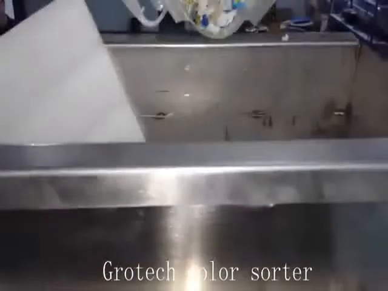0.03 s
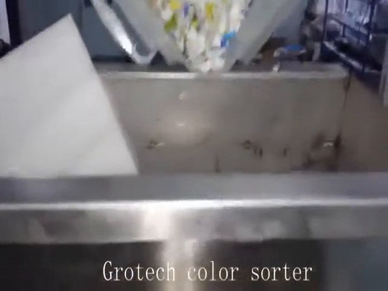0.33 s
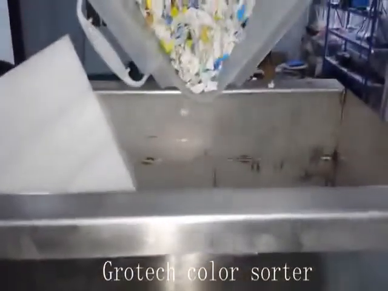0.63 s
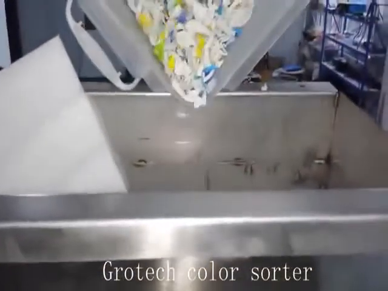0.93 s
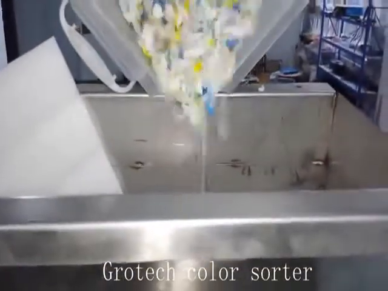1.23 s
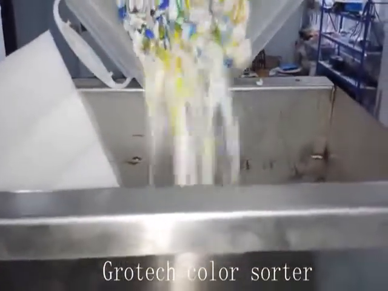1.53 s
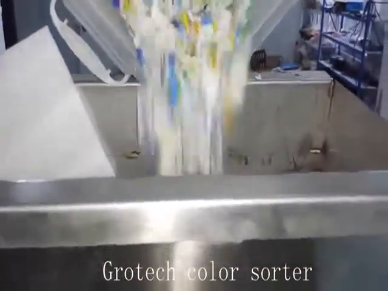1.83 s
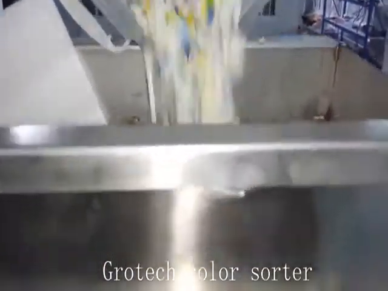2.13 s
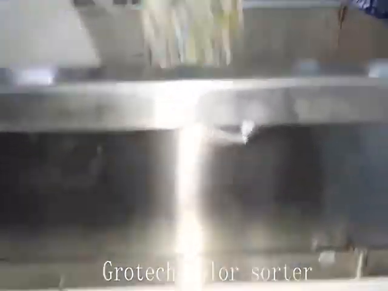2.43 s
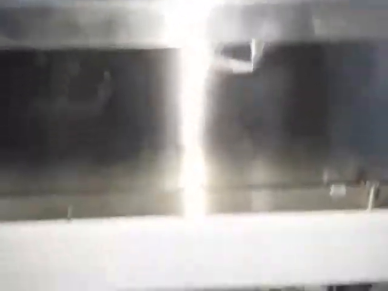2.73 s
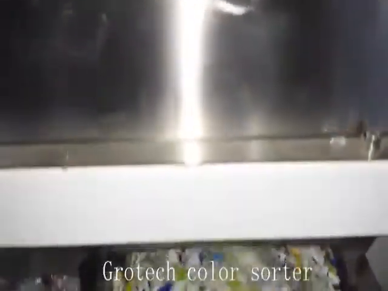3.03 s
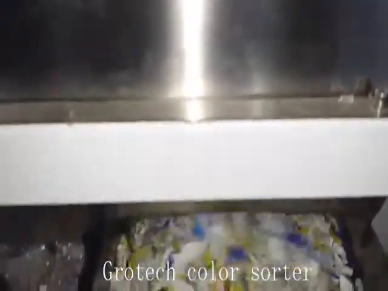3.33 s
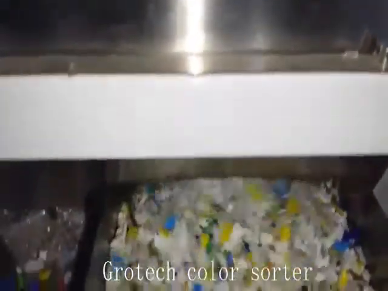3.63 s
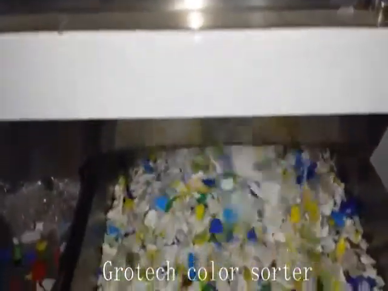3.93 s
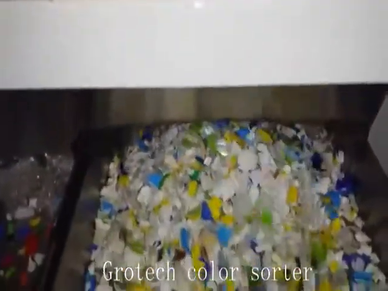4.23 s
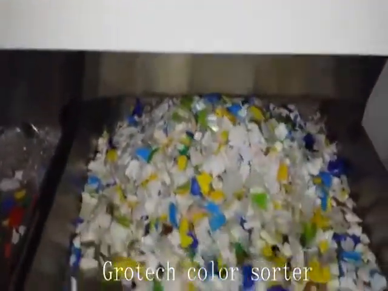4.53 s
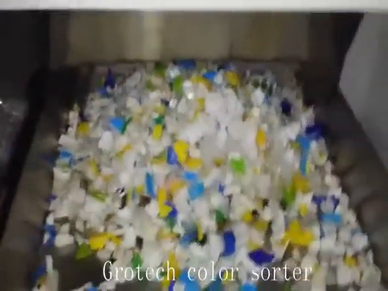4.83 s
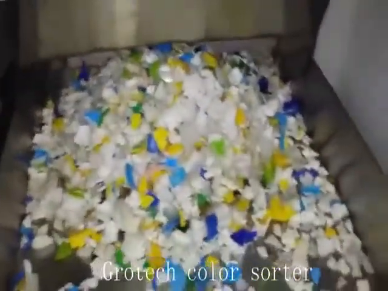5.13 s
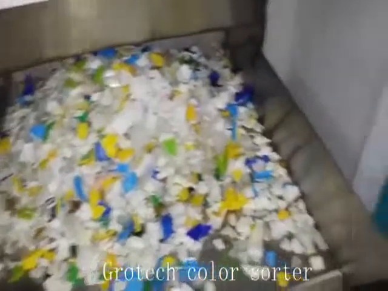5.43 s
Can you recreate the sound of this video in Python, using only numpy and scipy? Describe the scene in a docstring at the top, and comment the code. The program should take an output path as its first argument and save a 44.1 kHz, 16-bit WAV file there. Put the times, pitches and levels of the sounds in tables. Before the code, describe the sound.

Plastic flakes trickle, then pour hissing and rattling into a steel hopper, dying away over the low rumble of factory machines.

```python
"""A machine hall, stereo microphone close to the steel hopper of a sorting machine.
Plastic flakes slide out of a bag and pour in: thousands of tiny collisions hiss and rattle, the sheet
steel drums under them, and single flakes snap out. Further off, machines rumble and hum; thin whistles
come in near the end. The recorder's gain control pushes the hall back while the pour is loud and lets
it creep up again as the stream dies away."""
import sys
import numpy as np
from scipy import signal
from scipy.fft import rfft, irfft, next_fast_len
from scipy.io import wavfile
from scipy.ndimage import uniform_filter1d, map_coordinates

SR = 44100
rng = np.random.default_rng(int(sys.argv[2]) if len(sys.argv) > 2 else 0)


def transcribe(u):
    """Save the signal u as a 16-bit wav file named by the first command-line argument.

    u: samples, shape (n,) or (channels, n), limited to [-1, 1]; the rate is SR.
    q: integer samples, one column per channel.
    """
    v = np.clip(np.atleast_2d(u).T, -1, 1)
    q = np.round(v * 32767).astype(np.int16)
    wavfile.write(sys.argv[1], SR, q)


N = 246078

# spectrum of the distant machines: f/Hz, level/dB
RUMBLE_SPECTRUM = [(25,-17), (60,-7.5), (100,0), (160,2), (330,-1), (500,-2.5), (800,-5), (1150,-7),
                   (1600,-12.5), (2400,-13), (3300,-18.5), (5000,-16.5), (8000,-19), (14000,-58)]
# how alike their rumble is left and right: f/Hz, correlation
RUMBLE_LIKENESS = [(30, 0.14), (100, 0.94), (300, 0.82), (600, 0.68), (1200, 0.035), (4000, 0.089)]
# tones of the machine frames: f/Hz, relative level/dB
DRONE_TONES = [(168,-6), (234,-1), (338,-2.5), (409,-2), (915,-11.5), (1100,-4.5)]
# strength of the stream of flakes: t/s, level/dB
STREAM_FLOW = [(0,-21.5), (.22,-29), (.5,-42.5), (.68,-39.5), (.85,-35.5), (1.15,-33.5), (1.39,-29.5),
               (1.43,-36), (1.49,-15), (1.535,-16), (1.56,-22.5), (1.588,-17), (1.608,-27.5), (1.63,-6),
               (1.75,-7.5), (1.88,-1), (2.35,-.5), (2.6,1.5), (3.2,-2), (3.9,-4.5), (3.955,-9.5),
               (4.005,-17.5), (4.05,-16), (4.2,-22.5), (4.5,-42), (4.9,-51), (5.42,-53), (5.58,-36.5)]
# clumps that land at once: t/s, length/s, hiss swell/dB, wall swell/dB, floor swell/dB
CLUMP_SWELLS = [(0.334,0.012,2,-1,-4), (.781,0.016,4,6,5), (1.221,0.044,2,2,7), (1.354,0.0097,1,3,5),
                (1.5,0.028,0.5,-1,1.5), (1.658,0.037,3.5,4.5,-3.5), (1.791,0.03,7.5,10,3.5),
                (1.881,0.016,3,6.5,1), (1.927,0.0085,1.5,1.5,-1), (1.974,0.012,3,7,-3),
                (2.038,0.029,4.5,2,5), (2.157,0.023,3,1,2.5), (2.344,0.097,1.5,1,7), (2.508,.02,1,-4.5,3),
                (2.68,0.0072,1.5,3,-5.5), (2.743,0.0092,-0.5,2,1), (2.795,0.02,4.5,4.5,5.5),
                (2.916,0.0088,4.5,4.5,0), (2.984,0.021,5.5,9.5,8.5), (3.061,0.028,3.5,1,3),
                (3.293,0.04,3.5,8,4), (3.393,0.05,2,7.5,1), (3.606,0.021,-3,6,2.5), (3.696,0.012,2,9.5,1),
                (3.799,0.087,-1,5.5,-1), (4.07,0.058,9.5,5,1.5), (4.118,0.036,1,4.5,7.5)]
# flake collisions, with a sharp sheen near 8 kHz: f/Hz, level/dB
FLAKE_SPECTRUM = [(40,-62), (300,-37), (1500,-31), (2750,-20), (3100,-24.5), (3450,-18), (3800,-15),
                  (4900,-11), (5900,-10.5), (7000,-4), (7700,-1.5), (8100,1), (8450,-3.5), (8900,-5.5),
                  (11000,-9.5), (14500,-14.5)]
# where the flakes sit in the stereo image: f/Hz, left minus right/dB
FLAKE_BALANCE = [(1500,28), (3000,-3), (4300,-11), (6200,-2), (7200,-11), (8000,-16.5), (8900,-11),
                 (10500,-11.5), (13500,-3)]
# broad response of the hopper wall: f/Hz, level/dB
WALL_SPECTRUM = [(25,-57), (80,-24), (250,-8.5), (600,-5.5), (850,-10), (1200,-15.5), (1600,-0.5),
                 (2100,-2.5), (2400,-1), (2570,-4), (2760,0.5), (3100,-11), (3450,-12.5), (5000,-5.5),
                 (9000,-66)]
# the wall is quieter in the thick of the pour: t/s, clatter change/dB
WALL_TRIM = [(1.5,3.5), (1.65,2.5), (2.0,0.5), (2.55,-1), (2.8,0.5), (3.3,0.5), (3.7,-1)]
# ringing of the hopper wall, its floor and the chute below: f/Hz, width/Hz, relative level/dB
WALL_RESONANCES = [(1060,55,-5), (1245,14,-5), (1441,16,4), (1580,30,-1), (1840,30,-1), (2035,18,3),
                   (2099,14,9.5), (2170,24,0), (2760,90,-4), (3440,50,-3)]
FLOOR_RESONANCES = [(168,8,-11), (321,18,0), (364,12,-2), (410,11,-2.5)]
CHUTE_RESONANCES = [(472,8,4), (501,9,2.5), (630,16,-8), (730,30,-13), (830,25,-12)]
# the microphone sinks towards the chute: t/s, drumming change/dB, chute relative to floor/dB
MIC_APPROACH = [(1.8,2,-5.5), (2.4,-0.5,-7), (3.0,4,3.5), (3.35,7.5,5.5), (3.65,10,5.5), (4.0,10.5,5.5),
                (4.35,16,6), (4.6,0,-2.5)]
# dull booms of the hopper body: t/s, f/Hz, level/dB
BODY_THUDS = [(.05,346,-22.5), (1.747,93,-31), (2.36,169.6,-13), (2.51,164,-16), (2.87,98,-20),
              (3.232,153,-21), (3.53,136,-14.5), (3.59,115,-16.5)]
# knocks against the steel: t/s, relative level/dB
STEEL_KNOCKS = [(0.105,-22), (5.258,-25), (5.267,-30.5)]
# single hard flakes: t/s, relative level/dB, wall share/dB, ring f/Hz
FLAKE_SNAPS = [(.154,-14,-30,7500), (.1889,-12,-30,7750), (.2085,-14,-37,7000), (.2205,-12,-31,7350),
               (.272,-17,-33,8200), (.3305,-15.5,-32,4700), (.3425,-18,-32,8400), (.448,-19,-14,11500),
               (.61,-24.5,-20,8500), (.9811,-20,-27,7000), (1.013,-20,-24,7600), (1.0465,-8.5,-19,6600),
               (1.1861,-18,-18,8000), (1.226,-14,-28,7600), (1.2715,-16.5,-15,9000), (1.3602,-7,-26,8400),
               (1.4452,-1,-20,7900), (1.4478,0.5,-23.5,6600), (1.4676,2,-12,7000), (1.6148,11,-54,8200),
               (1.6175,13,-54,7900), (2.097,11.5,-34,7600), (2.3219,7,-35,8300), (2.3948,7,-24,7900),
               (2.498,9,-45,8200), (2.7744,2,-37,7450), (2.9485,19.5,-26,7960), (3.4119,14,-23,7800),
               (3.522,11,-12,8600), (3.5335,14,-38,8500), (3.537,11,-38,8500), (4.2665,-1,-20,7500),
               (4.2703,-1,-26,7140), (4.3632,-20,-21,7000), (4.4095,-22,-26,9400), (4.431,-19,-14,6100),
               (4.6362,-28,-26,9000), (4.6751,-28,-24,9000), (4.9497,-25,-11,9000), (5.2139,-31.5,-21,8500)]
# the first big clump on bare steel: f/Hz, level/dB
CRASH_SPECTRUM = [(200,-12), (900,-9), (1400,-6.5), (2000,1), (2900,-8.5), (4000,-11), (5300,3), (6100,-14),
                  (7000,0), (8000,4), (9000,-1), (14000,-30)]
# stray flakes in the chute: f/Hz, level/dB
SETTLING_SPECTRUM = [(2000,-25), (3300,-14), (4500,-3.5), (5800,-3), (7600,-1), (9500,-7), (14000,-12)]
# thin whistles of the machine: start/s, end/s, f/Hz, level/dB, left minus right/dB
MACHINE_WHISTLES = [(4.59,4.784,7780,-46,-19), (4.62,5.276,3180,-56.5,0), (5.38,5.68,3100,-57,0)]


def amp(db):
    """Decibels to gain."""
    return 10 ** (np.asarray(db) / 20)


def unit(pair):
    """Scale a stereo pair so that its middle has rms 1."""
    return pair / np.sqrt(np.mean(pair.mean(0) ** 2) + 1e-20)


def along(points, hz):
    """Points of (f/Hz, value) joined on a log frequency axis."""
    f, values = np.transpose(points)
    return np.interp(np.log(hz + 1), np.log(f), values)


def curves(rows):
    """One value per sample for each column after the time."""
    times, *columns = np.transpose(rows)
    return [np.interp(np.arange(N) / SR, times, column) for column in columns]


def wobble(rate):
    """A smooth random curve, rate knots a second."""
    return map_coordinates(rng.standard_normal(int(N * rate / SR) + 4), [np.arange(N) * rate / SR])


def pan(lean_db):
    """Left and right gains for a level difference; positive leans left."""
    return amp(np.array([[.5], [-.5]]) * lean_db)


def filtered(x, response):
    """Pass x through a complex response of frequency."""
    size = 2 * next_fast_len(N // 2 + SR // 4)
    return irfft(rfft(x, size) * response(np.fft.rfftfreq(size, 1 / SR)), size)[..., :N]


def causal(points, hz):
    """Minimum-phase response with the given spectrum and unit power."""
    gain = amp(along(points, hz))
    cepstrum = irfft(np.log(gain / np.sqrt(np.mean(gain ** 2))))
    half = len(cepstrum) // 2
    cepstrum[1:half] *= 2
    cepstrum[half + 1:] = 0
    return np.exp(rfft(cepstrum))


def ringing(modes, hz):
    """Response of a set of resonances, alternating in sign."""
    return sum((-1) ** k * amp(db) * 1j * hz * width / (centre ** 2 - hz ** 2 + 1j * hz * width)
               for k, (centre, width, db) in enumerate(modes))


def burst(t60):
    """Dying stereo noise of unit energy, new each time."""
    t = np.arange(int(t60 * SR) + 8) / SR
    noise = rng.standard_normal((2, len(t))) * amp(-60 * t / t60)
    return noise / np.sqrt(np.sum(noise ** 2, axis=1, keepdims=True))


def add(track, start_s, sound):
    """Mix a sound into a track at a time."""
    span = track[:, round(start_s * SR):][:, :sound.shape[1]]
    span += sound[:, :span.shape[1]]


def hall(rumble_db=-40, hum_db=-46.5, drone_db=-51):
    """Distant machines: an uneven rumble, a mains hum and the wavering drone of their frames."""
    def mid_and_side(hz):
        angle = np.arccos(np.clip(along(RUMBLE_LIKENESS, hz), -1, 1)) / 2
        return amp(along(RUMBLE_SPECTRUM, hz)) * [np.cos(angle), np.sin(angle)]

    def tone(hz):
        level = np.sqrt(2) * amp(0.83 * wobble(17))
        return level * np.sin(2 * np.pi * hz * t + 0.043 * np.sqrt(hz) * wobble(14))

    t = np.arange(N) / SR
    surge_db = 8.5 * np.exp(-t / 0.18)  # a heavier rumble dies away at first
    mid, side = filtered(rng.standard_normal((2, N)), mid_and_side)
    rumble = unit(np.array([mid + side, mid - side]))
    rumble *= amp(rumble_db + 1.1 * surge_db + 0.86 * wobble(18))
    drone = sum(amp(db) * tone(hz) for hz, db in DRONE_TONES) * amp(drone_db + surge_db)
    hum = tone(100.3) * amp(hum_db)
    return pan(0.82) * rumble + pan(5.4) * (hum + drone)


def clump_swells(attack_s=0.019, release_s=0.066):
    """Each clump rises, holds and falls away: dB added to the hiss, the wall and the floor."""
    t = np.arange(N) / SR
    out = np.zeros((3, N))
    for start, length, *swell_db in CLUMP_SWELLS:
        shape = np.minimum(1 + (t - start) / attack_s, 1 - (t - start - length) / release_s)
        out += np.outer(swell_db, np.clip(shape, 0, 1))
    return out


def collisions(rate, spread_db, t60):
    """Random impacts, rate a second, at a steady mean power; each is a brief puff of noise."""
    chance = np.clip(rate / SR, 0, 1)
    sizes = amp(spread_db * np.clip(rng.standard_normal(N), -2, 2))
    energy = (rng.random(N) < chance) * sizes ** 2 / chance
    decay = np.exp(-2 * np.log(1000) / (t60 * SR))
    envelope = np.sqrt(signal.lfilter([1], [1, -decay], energy))
    return unit(envelope * rng.standard_normal((2, N)))


def pings(rate, t60, low_hz, high_hz):
    """Random strikes on a sheet or a flake; each rings with a short note of its own."""
    t = np.arange(int(t60 * SR)) / SR
    out = np.zeros((2, N))
    for when, spot, size, left_phase, right_phase in rng.random((int(rate * N / SR), 5)):
        hz = low_hz * (high_hz / low_hz) ** np.sqrt(spot)  # the modes crowd together higher up
        ring = np.sin(2 * np.pi * (hz * t + np.array([[left_phase], [right_phase]])))
        add(out, when * N / SR, ring * amp(10 * size - 60 * t / t60) * (1 - np.exp(-t * hz)))
    return unit(out)


def reflected(x, wet_db, t60):
    """Sound bounces between the hopper walls, along paths that change as the microphone moves."""
    hop = SR // 8
    fade = np.hanning(2 * hop)
    echo = np.zeros((2, N))
    padded = np.pad(x, ((0, 0), (0, 2 * hop)))
    for start in range(0, N, hop):
        piece = padded[:, start:start + 2 * hop] * fade
        add(echo, start / SR, signal.fftconvolve(piece, burst(t60), axes=1))
    return x + amp(wet_db) * echo


def plastic(x):
    """The bright voice of the flakes, louder on the microphone's right."""
    def response(hz):
        sides = pan(along(FLAKE_BALANCE, hz))
        return causal(FLAKE_SPECTRUM, hz) * 2 * sides / np.linalg.norm(sides, axis=0)
    return filtered(x, response)


def steel(x, ring_db=-2, drive=0.97):
    """The hopper wall: a dense clatter, with long modes ringing on after it."""
    def response(hz):
        modes = ringing(WALL_RESONANCES, hz)
        return amp(ring_db) * modes / np.sqrt(np.mean(np.abs(modes) ** 2))
    clatter = filtered(x, lambda hz: causal(WALL_SPECTRUM, hz))
    ring = filtered(x * drive, response)
    return pan(2.1) * (clatter + ring) / np.hypot(1, amp(ring_db) * drive)


def flake_hiss(rate, stream_db):
    """Flakes tick against each other, and the stiff ones ring, each at its own pitch."""
    ticks = collisions(rate, spread_db=3, t60=0.0083)
    chinks = pings(rate=260, t60=0.038, low_hz=6880, high_hz=8570)
    lean = pan(np.interp(stream_db, [-30, 0], [1.5, -2]))  # the full stream falls further to the right
    return unit(lean * plastic(reflected(ticks, wet_db=-0.5, t60=.09) + amp(-13) * chinks))


def wall_clatter(rate, stream_db, flutter_db):
    """Flakes strike the hopper wall; it takes a heavy stream to ring the sheet fully."""
    strikes = collisions(rate, spread_db=1, t60=0.008) * amp(flutter_db)
    dense = unit(steel(strikes, drive=np.interp(stream_db, [-28, -12], [.25, 1])))
    notes = pings(rate=460, t60=0.12, low_hz=555.3, high_hz=2519)
    return unit(dense + amp(-3.5) * pan(2.8) * notes)


def drumming(rate, chute_db):
    """Uneven loads of flakes drum on the hopper floor and the chute below it."""
    blows = collisions(rate, spread_db=2.5, t60=0.0023)
    blows = (blows + .5 * blows[::-1]) * amp(wobble(18))  # long waves reach both channels alike
    blows = filtered(blows, lambda hz: hz ** 2 / (hz ** 2 + 110 ** 2))  # a sheet radiates little bass
    floor = unit(filtered(blows, lambda hz: ringing(FLOOR_RESONANCES, hz)))
    chute = unit(filtered(blows, lambda hz: ringing(CHUTE_RESONANCES, hz)))
    return pan(2.4) * (floor + amp(chute_db) * chute) / np.hypot(1, amp(chute_db))


def pour():
    """The stream, close up and in clumps: more flow means more collisions, on plastic and on steel."""
    stream_db, = curves(STREAM_FLOW)
    near_db, chute_db = curves(MIC_APPROACH)
    trim_db, = curves(WALL_TRIM)
    hiss_db, wall_db, floor_db = clump_swells()
    hiss_db += stream_db
    wall_db += -19 + 0.72 * stream_db + trim_db  # slopes under 1: a thick stream cushions its own fall
    floor_db += -27 + 0.74 * stream_db + near_db
    lumpiness = np.interp(stream_db, [-35, -10], [.45, .9])  # a thin trickle runs more evenly
    lumps = lumpiness * (.6 * wobble(28) + 1.3 * wobble(85))
    rate = 600 + 7000 * amp(.45 * hiss_db)  # collisions a second
    hiss = flake_hiss(rate, stream_db)
    flutter_db = 2.35 * lumps + 1.4 * lumpiness * wobble(29.71)
    clatter = wall_clatter(rate / 2, stream_db, flutter_db)
    drum = drumming(rate / 2, chute_db)
    return hiss * amp(hiss_db + 1.075 * lumps) + clatter * amp(wall_db) + drum * amp(floor_db)


def thuds(t60=0.26, attack_s=0.014):
    """Soft, heavy clumps make the hopper body boom briefly."""
    t = np.arange(SR // 2) / SR
    out = np.zeros((2, N))
    for start, hz, db in BODY_THUDS:
        envelope = amp(db - 60 * t / t60) * (1 - np.exp(-t / attack_s))
        add(out, start, pan(4.8) * envelope * np.sin(2 * np.pi * hz * t))
    return out


def knocks():
    """Heavier blows shake the wall, thud in the floor and jolt the loose flakes."""
    blows = np.zeros((2, N))
    for start, db in STEEL_KNOCKS:
        add(blows, start, amp(db + 20.5) * burst(t60=0.1))
    thud = filtered(blows.mean(0), lambda hz: ringing([(233, 370, 8), (695, 400, -11)], hz))
    jolt = filtered(blows, lambda hz: ringing([(5600, 760, 0)], hz))
    return amp(-2.5) * steel(blows, ring_db=-6) + amp(13) * thud + amp(7) * jolt


def snaps(width_hz=3600, t60=0.019):
    """A hard flake strikes, rings briefly in its own band, and sets the wall clattering."""
    ticks, blows = np.zeros((2, 2, N))
    for start, db, wall_db, hz in FLAKE_SNAPS:
        ring = signal.lfilter(*signal.iirpeak(hz, hz / width_hz, SR), burst(t60))
        add(ticks, start, amp(db + 13) * ring)
        add(blows, start, amp(db + wall_db + 17) * burst(t60))
    return plastic(reflected(ticks, wet_db=-10, t60=.08)) + steel(blows)


def crash(start_s=1.445, level_db=-13, t60=0.28):
    """The first big clump hits bare steel all at once, and its flakes rattle on as they scatter."""
    since = np.arange(N) / SR - start_s
    envelope = (since > 0) * amp(-60 * np.maximum(since, 0) / t60)
    scatter = collisions(5200, spread_db=3.5, t60=0.0067) * envelope
    return pan(-1.5) * amp(level_db) * filtered(scatter, lambda hz: causal(CRASH_SPECTRUM, hz))


def settling(loudest_s=4.26, loudest_db=-29.5, rise_db_per_s=34, fall_db_per_s=63):
    """The last stray flakes skitter down the chute, off to the right, and come to rest."""
    since = np.arange(N) / SR - loudest_s
    level_db = loudest_db + np.minimum(rise_db_per_s * since, -fall_db_per_s * since)
    skitter = reflected(collisions(640, spread_db=5, t60=0.0067), wet_db=3.5, t60=0.071)
    return amp(level_db) * unit(pan(-11) * filtered(skitter, lambda hz: causal(SETTLING_SPECTRUM, hz)))


def whistles(fade_s=0.13):
    """Faint high tones of the machine fade in and out once the pour has died down."""
    t = np.arange(N) / SR
    out = np.zeros((2, N))
    for start, end, hz, db, lean_db in MACHINE_WHISTLES:
        fade = np.clip(np.minimum(t - start, end - t) / fade_s, 0, 1)
        level = fade * amp(db + 2.5 * wobble(30))
        out += pan(lean_db) * level * np.sin(2 * np.pi * hz * t + .5 * wobble(60))
    return out


def gain_control(x, threshold_db=-14, recovery_db_per_s=10.5,
                 sense_s=0.0042, duck_s=0.01, lookahead_s=0.0063):
    """The gain drops quickly, dB for dB over the threshold, and creeps back at a steady rate."""
    samples = np.arange(N)
    power = np.abs(uniform_filter1d(np.mean(x ** 2, axis=0), round(sense_s * SR)))
    excess_db = np.maximum(10 * np.log10(power + 1e-20) - threshold_db, 0)
    recovered_db = recovery_db_per_s * samples / SR
    held_db = np.maximum.accumulate(excess_db + recovered_db) - recovered_db
    ahead_db = np.interp(samples + lookahead_s * SR, samples, held_db)
    smoothing = np.exp(-1 / (duck_s * SR))
    return x * amp(-signal.lfilter([1 - smoothing], [1, -smoothing], ahead_db))


def scene():
    """At the microphone: the hopper close in front, the hall behind it."""
    return pour() + crash() + snaps() + settling() + knocks() + thuds() + hall() + whistles()


def record(dry):
    """The recorder rides its gain, rounds off the highest peaks and cuts the extreme treble."""
    ceiling, top_hz = .88, 14500
    ridden = gain_control(dry)
    limited = ridden / (1 + np.abs(ridden / ceiling) ** 6) ** (1 / 6)
    return filtered(limited, lambda hz: 1 / np.sqrt(1 + (hz / top_hz) ** 400))


dry = scene()
out = record(dry)
transcribe(out)
```